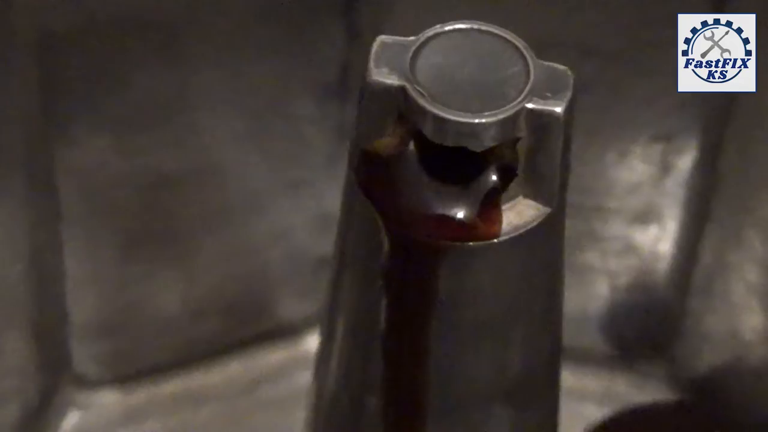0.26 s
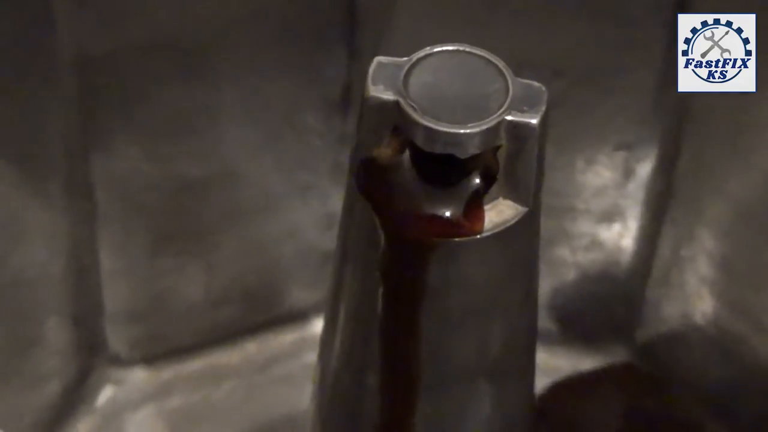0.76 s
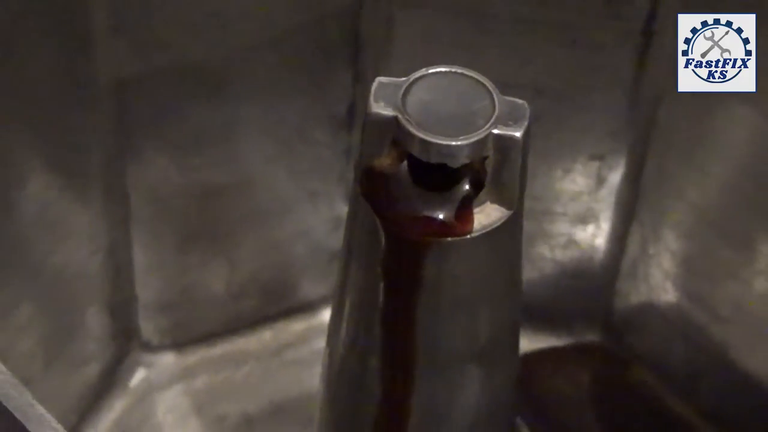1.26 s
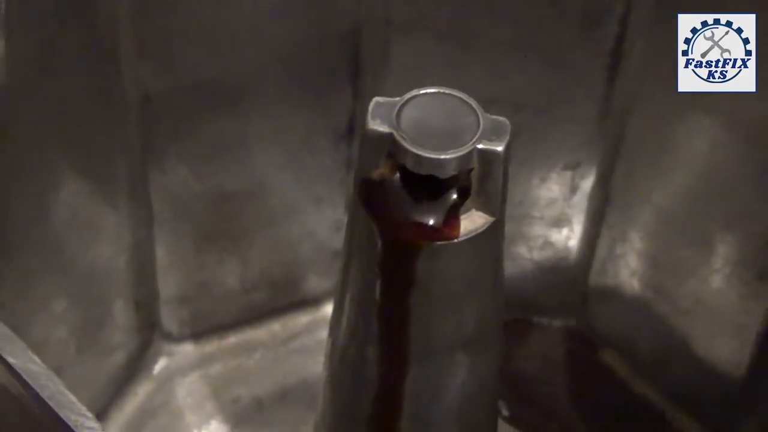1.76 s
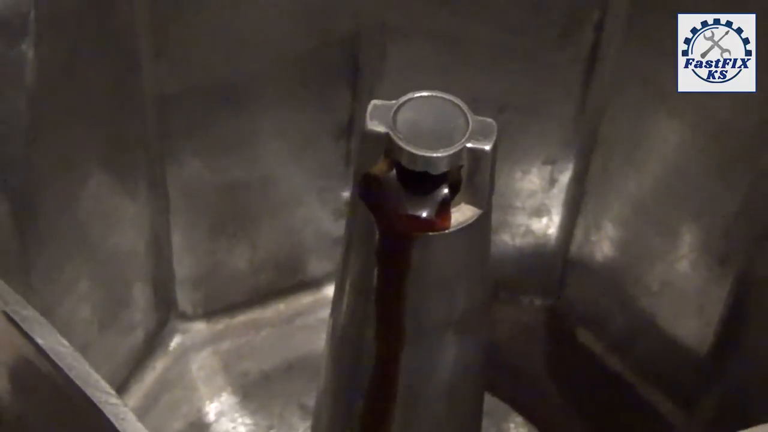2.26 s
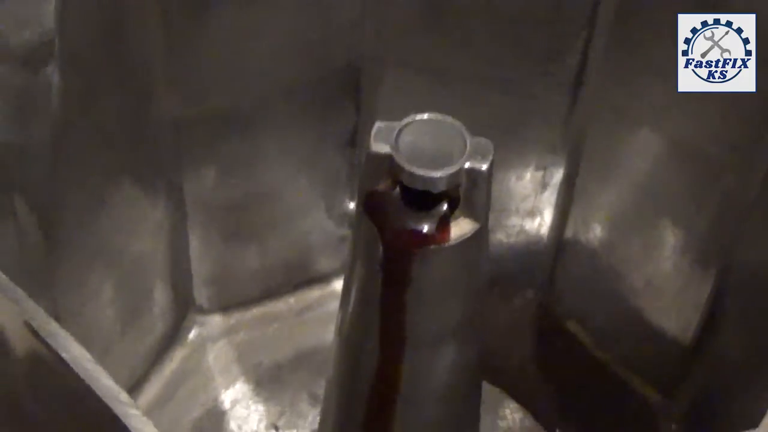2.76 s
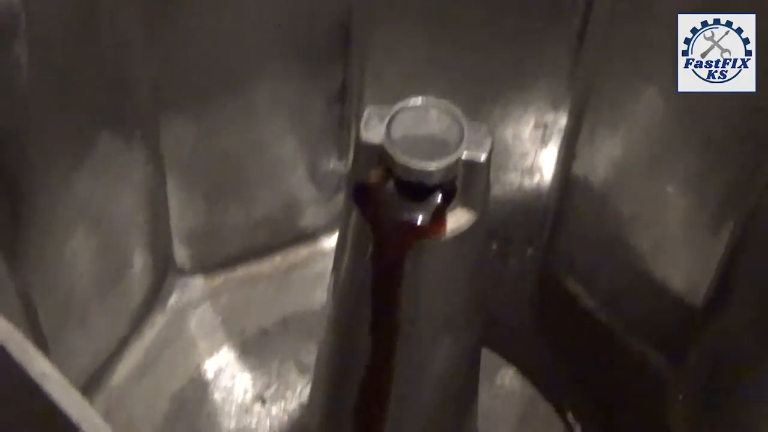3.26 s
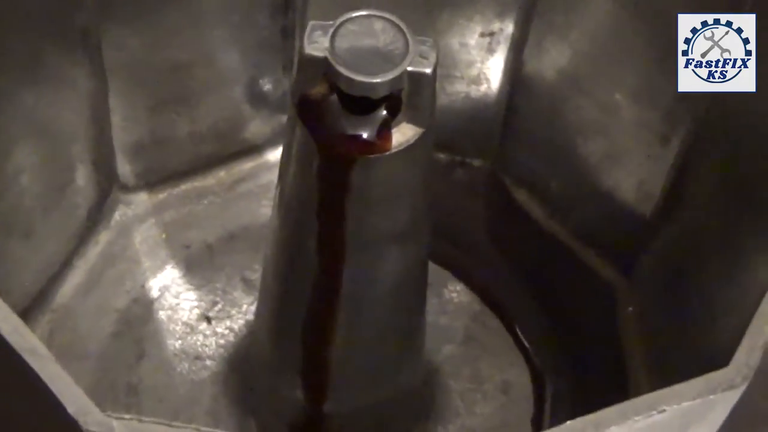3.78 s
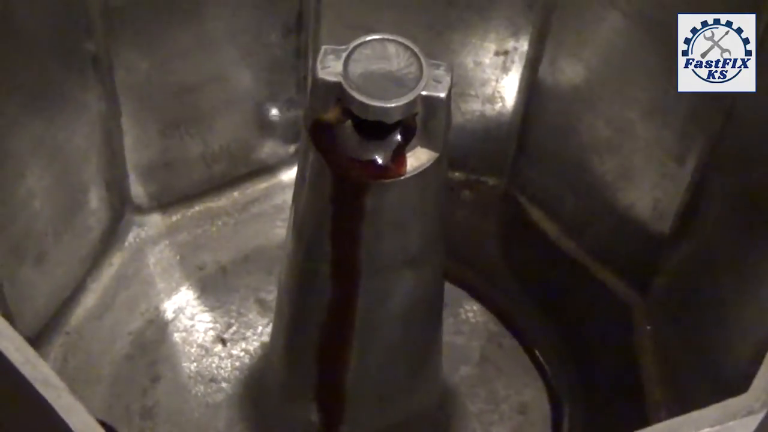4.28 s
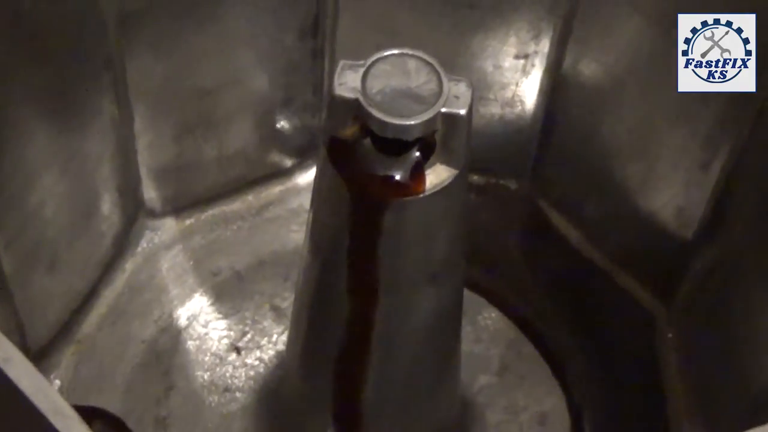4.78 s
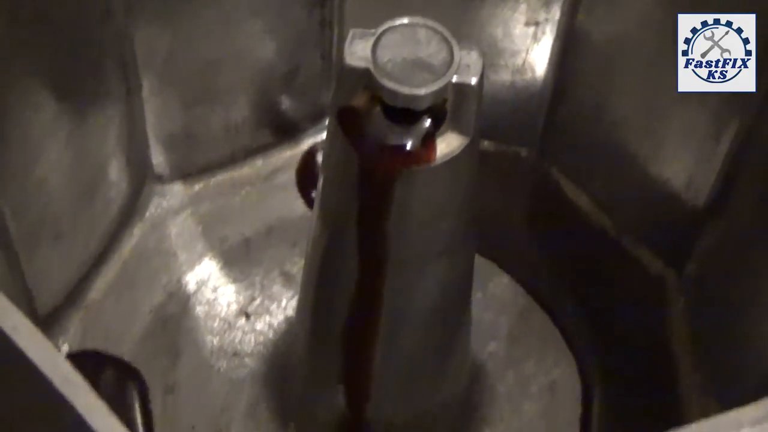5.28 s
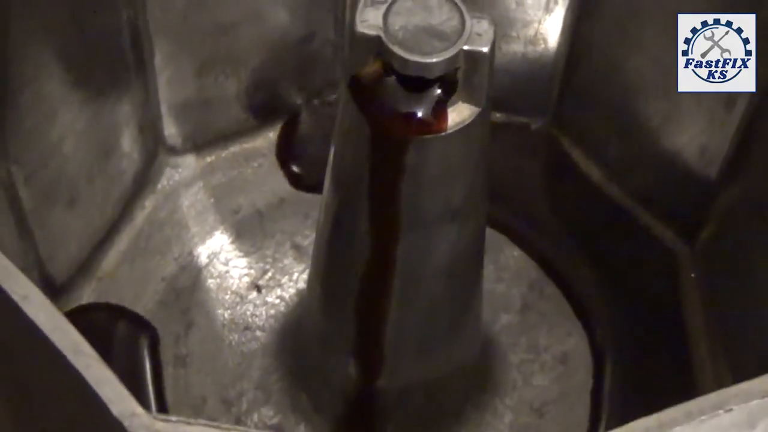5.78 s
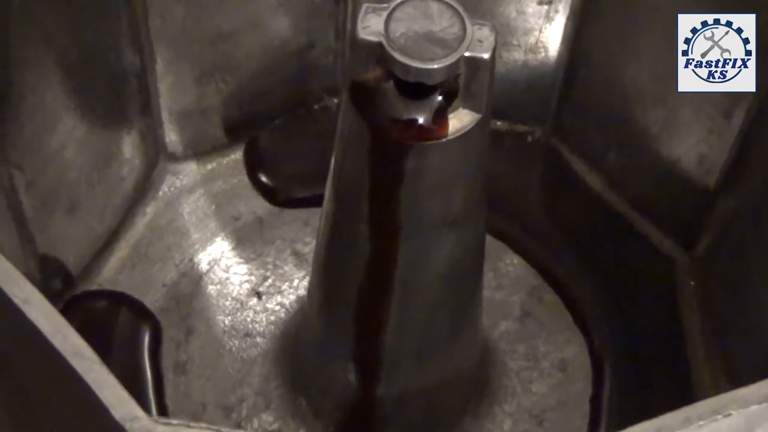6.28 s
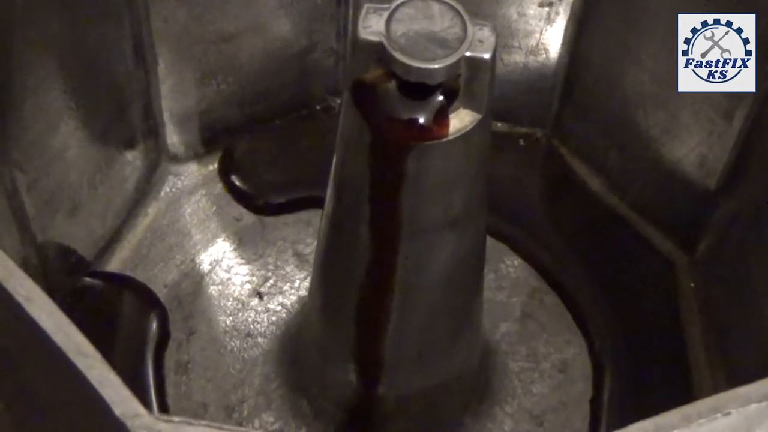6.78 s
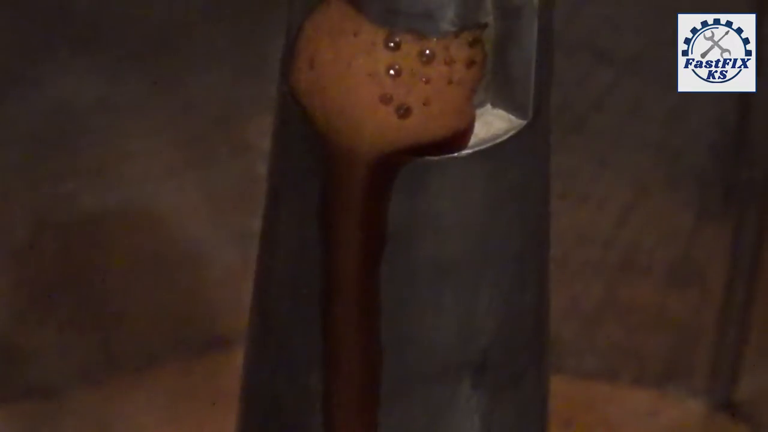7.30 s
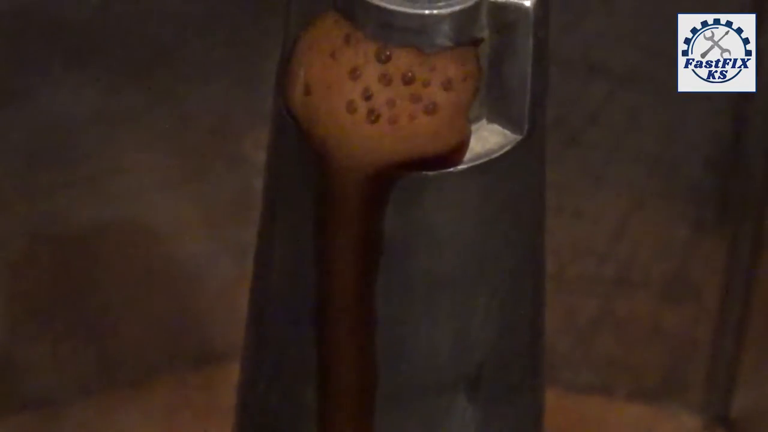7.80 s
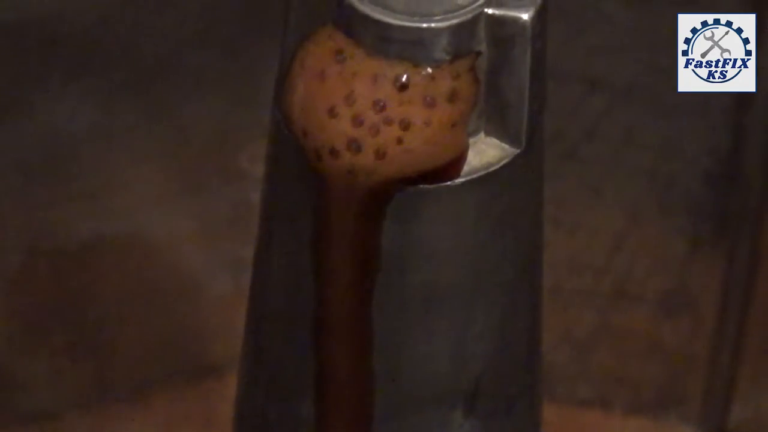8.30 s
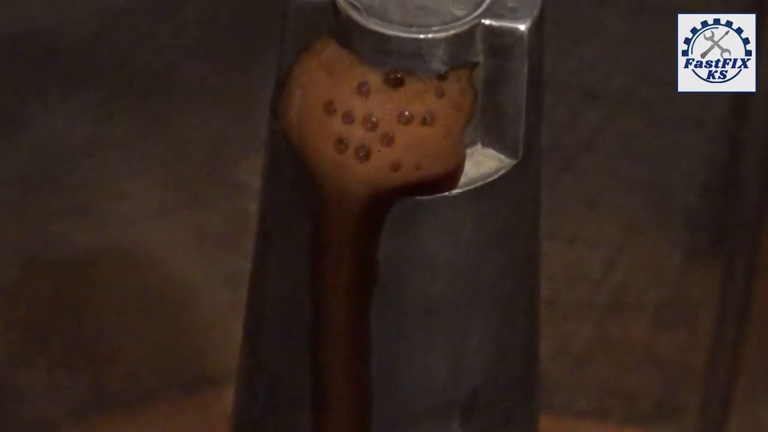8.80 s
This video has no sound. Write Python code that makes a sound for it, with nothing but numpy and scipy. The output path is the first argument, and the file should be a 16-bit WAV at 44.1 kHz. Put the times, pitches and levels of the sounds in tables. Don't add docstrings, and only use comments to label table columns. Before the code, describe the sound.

Close stereo microphone, quiet kitchen: fine, high steam hiss with a slight sputter and a weak boiling murmur beneath. Two seconds pass without pops, then hot metal snaps and knocks at irregular intervals, each with a short pot ring, the hiss dipping around them. After a cut at about seven seconds, frothy steam hisses harder, with one tick and small dull gurgles.

```python
import sys
import numpy as np
from scipy import signal
from scipy.fft import rfft, irfft, next_fast_len
from scipy.io import wavfile
from scipy.ndimage import uniform_filter1d, map_coordinates

SR = 44100
rng = np.random.default_rng(int(sys.argv[2]) if len(sys.argv) > 2 else 0)


def int16_out(signal):
    q = np.round(np.clip(np.atleast_2d(signal).T, -1, 1) * 32767)
    wavfile.write(sys.argv[1], SR, q.astype(np.int16))


def linear_from_db(decibels):
    return 10 ** (np.asarray(decibels, float) / 20)


N = 399105


def unit(x):
    return x / np.sqrt(np.mean(x ** 2) + 1e-20)


def along(points, hz):
    f, v = np.transpose(points)
    return np.interp(np.log(hz + 1), np.log(f + 1), v)


def curve(points):
    s, v = np.transpose(points)
    return np.interp(np.arange(N) / SR, s, v)


def latest(rows):
    rows = np.array(rows)
    index = np.searchsorted(rows[:, 0], np.arange(N) / SR, "right").clip(1) - 1
    return rows[index].T


def wobble(rate):
    knots = rng.standard_normal(int(N * rate / SR) + 4)
    return map_coordinates(knots, [np.arange(N) * rate / SR])


def filtered(x, response):
    m = next_fast_len(N + SR // 2)
    return irfft(rfft(x, m) * response(np.fft.rfftfreq(m, 1 / SR)), m)[..., :N]


def ping(hz, t60, t):
    return linear_from_db(-60 * t / t60) * np.sin(2 * np.pi * hz * t)


def add(track, s, sound):
    start = round(s * SR)
    track[:, start:start + sound.shape[-1]] += sound


# frequency in Hz, left-right likeness from 0 to 1.
STEREO_LIKENESS = [(60, 0.86), (150, 0.99), (380, 0.73), (950, 0.55), (2380, 0.88), (5980, 0.87),
                   (15000, 0.97)]


def rush(spectra, drive, patchy_db, ripple_db):
    z = signal.stft(rng.standard_normal((2, N)) * drive, nperseg=512)[2]
    patches = uniform_filter1d(rng.standard_normal(z.shape[1:]), 5, 0)
    patches = unit(uniform_filter1d(patches, 10, 1))
    pair = signal.istft(z * linear_from_db(patchy_db * patches), nperseg=512)[1][:, :N]
    out = []
    for spectrum in spectra:
        knots = rng.standard_normal(SR // 50)

        def mid_side_gain(hz):
            ripple = ripple_db * map_coordinates(knots, [hz / 40])
            angle = np.arccos(np.clip(along(STEREO_LIKENESS, hz), -1, 1)) / 2
            return linear_from_db(along(spectrum, hz) + ripple) * [np.cos(angle), np.sin(angle)]

        mid, side = filtered(pair, mid_side_gain)
        out.append(unit(np.array([mid + side, mid - side])))
    return out


# frequency in Hz, density in dB per Hz.
HUM_SPECTRUM = [(15, -46), (25, -18), (53, -11), (92, -17), (162, -7), (265, -5.5), (296, 0), (341, -5),
                (412, -0.5), (548, -2.5), (632, -0.5), (867, -5), (1100, -6), (1430, -28), (2420, -120)]


def kitchen_hum():
    hum, = rush([HUM_SPECTRUM], linear_from_db(0.58 * wobble(14)), patchy_db=0.7, ripple_db=0.4)
    return hum


# frequency in Hz, density in dB per Hz.
DRONE_SPECTRUM = [(220, -31), (265, -8), (297, 4), (335, 1), (400, -38)]
# time in seconds, level in dB.
DRONE_FADE = [(0, -89), (2, -88), (3.4, -82), (5, -91), (6, -94), (9.05, -107)]


def drone():
    band, = rush([DRONE_SPECTRUM], linear_from_db(1.3 * wobble(19)), patchy_db=1.5, ripple_db=5.5)
    return linear_from_db(curve(DRONE_FADE)) * band


# frequency in Hz, t60 in seconds.
ROOM_DECAY = [(300, 0.24), (1000, 0.78), (4000, 0.09), (12000, 0.15)]


def kitchen(x):
    hz, t, z = signal.stft(rng.standard_normal((2, SR // 2)), SR, nperseg=256)
    decay = linear_from_db(-60 * t / along(ROOM_DECAY, hz)[:, None])
    tail = signal.istft(z * decay, SR, nperseg=256)[1]
    tail = tail / np.linalg.norm(tail[0])
    late = np.pad(x, ((0, 0), (400, 0)))
    return signal.fftconvolve(late, tail, axes=1)[:, :N]


# start in seconds, peak level in dB, pitch in Hz, t60 in seconds.
GURGLES = [(2.613, -62, 460, .06), (2.885, -58, 420, 0.036), (3.926, -59.5, 447, 0.04),
           (5.189, -59, 492, 0.033), (6.25, -64, 500, .05), (6.255, -64, 2240, .2), (6.262, -63, 1870, .12),
           (6.28, -65, 360, 0.054), (6.3, -66, 794, .04), (6.27, -66, 1400, .04), (6.33, -63, 1100, 0.044),
           (2.093, -51, 390, 0.023), (2.23, -55, 400, .025), (2.742, -54, 380, 0.027),
           (2.012, -58, 420, .04), (2.045, -59, 446, 0.043), (6.593, -51, 480, 0.033),
           (6.594, -61, 230, 0.028), (6.5935, -48, 860, 0.015), (7.321, -53.5, 720, 0.051),
           (7.333, -57, 420, .1), (7.345, -60, 660, .08), (7.37, -60, 627, .1), (7.393, -57, 720, .05),
           (7.415, -66, 430, .1)]


def thuds():
    out, t = np.zeros((2, N + SR)), np.arange(SR // 5) / SR
    glide = t * (1 + 0.57 * t)
    swell = 1 - np.exp(-t / 0.0017)
    for s, db, hz, t60 in GURGLES:
        tone = ping(hz, t60, glide) + 0.3 * ping(3.9 * hz, t60 / 2, glide)
        add(out, s, linear_from_db(db) * swell * tone)
    return out[:, :N]


# frequency in Hz, density in dB per Hz.
SIMMER_SPECTRUM = [(410, -49), (700, -17), (871, -14.5), (941, -14), (1670, -10), (2110, -6), (3680, -8.5),
                   (4500, -0.5), (5850, -32), (9900, -120)]


def simmer(sputter):
    boil, = rush([SIMMER_SPECTRUM], linear_from_db(2.5 * sputter), patchy_db=0.9, ripple_db=1.18)
    return boil


# frequency in Hz, density in dB per Hz.
JET_COLOURS = [
    [(1760, -39), (3000, -19), (3590, -14), (3820, -14), (4410, -9), (5420, -10.5), (6700, -2), (7380, -7),
     (8010, 1), (8290, 0.5), (10300, -5.5), (10600, -8.5), (11900, -8), (14900, -16.5), (15500, -17)],
    [(1760, -37), (3000, -17.5), (3240, -14), (3490, -13.5), (4440, -8), (5310, -9), (6750, -0.5),
     (7330, -7), (7800, 1.5), (9070, -0.5), (10800, -7.5), (11700, -8), (12700, -11), (14200, -13.5),
     (15500, -19.5)],
    [(1760, -52), (3000, -22), (3260, -14), (4200, -10), (4690, -13), (5270, -10), (6260, -2), (6890, -5.5),
     (8290, 1.5), (9780, -3.5), (10400, -10), (11300, -7), (11900, -11.5), (13400, -12.5), (15500, -17.5)],
    [(1760, -42.5), (3000, -13), (3690, -13), (5130, -4), (5760, -7), (6340, -1), (7380, 0.5), (8070, -1.5),
     (8760, 0.5), (9850, -2), (10600, -2.5), (11500, -5.5), (12900, -6.5), (14000, -11.5), (15500, -11.5)],
]
# time in seconds, colour number from 0 to 3.
JET_VIEW = [(0, 0), (1.985, 0), (1.993, 1), (3.9, 1.2), (4.6, 1.9), (7.113, 2), (7.121, 3), (9.05, 3)]
# centre in Hz, width in Hz, level in dB (not
POT_WALLS = [(2680, 150, -13), (5300, 340, -5), (6250, 640, 0), (6450, 250, -1), (7400, 150, -1),
             (8850, 120, 0), (9600, 40, -2), (10500, 96, -2), (12800, 180, -6), (12400, 200, -8),
             (13300, 82, -8), (14800, 78, -12)]


def jet(sputter):
    colours = rush(JET_COLOURS, linear_from_db(sputter + 0.4 * wobble(900)), patchy_db=0.4, ripple_db=1.87)

    def wall_lift(f):
        return 1 + 0.22 * sum(1 / (1 + (2 * (f - c) / w) ** 2) for c, w, _ in POT_WALLS)

    colours[-1] = unit(filtered(colours[-1], wall_lift))
    view = curve(JET_VIEW)
    return sum(np.clip(1 - np.abs(view - k), 0, 1) * colour for k, colour in enumerate(colours))


# start in seconds, jet, simmer and hum level in dB, hum drift in dB per second.
PLACES = [
    (0, -46, -62.5, -77, 0.5),
    (1.989, -49, -64.5, -78.5, -0.38),
    (7.117, -42, -59.5, -72.5, -1.4),
]
# start in seconds, depth in dB, hold in seconds, recovery in seconds.
GAIN_DIPS = [(0, -1, 0.01, 2.4), (1.989, -1.5, .05, 1), (2.075, -4, 0.12, 0.95), (3.245, -1.5, .8, 1),
             (4.005, -3.5, 0.29, 0.62), (5.33, -2.5, 0.81, .8), (7.117, -0.5, .2, 0.47)]


def levels():
    t = np.arange(N) / SR
    start, depth_db, hold, recovery = latest(GAIN_DIPS)
    gain_db = depth_db * (1 - np.clip((t - start - hold) / recovery, 0, 1))
    start, jet_db, simmer_db, hum_db, drift = latest(PLACES)
    hum_db = hum_db + drift * (t - start) + 0.76 * gain_db
    rows = np.array([jet_db + gain_db, simmer_db + gain_db, hum_db])
    return uniform_filter1d(rows, round(0.008 * SR), axis=1)


def duck(hits):
    release = np.exp(-np.arange(SR // 10) / SR / 0.0085)
    load = signal.fftconvolve(np.mean(hits ** 2, axis=0), release / release.sum())[:N]
    return 1 / np.sqrt(1 + np.abs(load) / linear_from_db(-46.5) ** 2)


def steam():
    jet_db, simmer_db, hum_db = levels()
    sputter = 0.15 * wobble(14) + 0.23 * wobble(35) + 0.29 * wobble(300)
    hiss = linear_from_db(jet_db) * jet(sputter)
    return hiss + linear_from_db(simmer_db + 1.73) * simmer(sputter) + linear_from_db(hum_db + 1.3) * kitchen_hum()


# start in seconds, level in dB, lower and upper pitch in Hz.
BRIGHT_SNAPS = [(2.0092, -25, 2750, 7040), (2.0093, -27, 3760, 7900), (2.0924, -25.5, 4000, 5800),
                (2.188, -44, 3700, 4500), (2.2305, -40, 2700, 3970), (2.275, -44, 3800, 4500),
                (3.269, -26, 5600, 7160), (4.022, -26.5, 4130, 5900), (4.1934, -30, 3850, 5700),
                (4.2223, -29, 2590, 5800), (5.347, -26.5, 4140, 6660), (7.1470, -36, 4500, 6700)]


def snaps(out, t):
    onset = 1 - np.exp(-t / 0.00011)
    for s, db, low_hz, high_hz in BRIGHT_SNAPS:
        rattle = linear_from_db(-60 * t / 0.031) * rng.standard_normal((2, len(t)))
        crack = linear_from_db(-60 * t / 0.004) * np.diff(rng.standard_normal(len(t) + 1))
        snap = ping(low_hz, 0.0036, t) - ping(high_hz, 0.0036, t)
        snap = snap + 0.5 * ping(1.3 * high_hz, 0.0048, t) + 0.22 * crack
        snap = snap * onset
        reflected = signal.fftconvolve(rattle, snap[None, :SR // 500], axes=1)[:, :len(t)]
        add(out, s, linear_from_db(db - 2.5) * (snap + 0.048 * reflected))


# start in seconds, level in dB, pitch in Hz.
SLIPS = [(2.0110, -46, 1010), (2.0093, -49, 2900), (2.043, -52, 900), (2.0923, -29.5, 1350),
         (2.199, -50, 910), (2.2306, -33, 1070), (2.7412, -37.5, 1000), (2.892, -45, 900),
         (3.2568, -36.5, 940), (3.269, -31.5, 1640), (4.0218, -31.5, 1650), (4.1938, -34.5, 1620),
         (4.2227, -32, 1900), (5.3476, -33.5, 2000), (7.1450, -33.5, 1220)]
# delay in seconds, level in dB.
KNOCK_PATHS = [(0, -1), (.0021, -2), (.0043, -6), (.0068, -13), (.0098, -16)]
# pitch in Hz, level against the knock in dB, t60 in seconds.
POT_RING = [(660, -12.5, 0.043), (750, -7.5, 0.024), (900, -23.5, 0.1), (1082, -18.5, 0.11),
            (1240, -14, 0.062), (1400, -16, 0.034), (1950, -4, 0.019), (2680, -8, 0.023), (3690, -18, 0.03)]
# pitch scatter as a share, time scatter in seconds, level scatter in dB.
ARRIVAL_SCATTER = (.1, .0001, 2.4)


def knocks(out, t):
    pitch_scatter, time_scatter, level_scatter = ARRIVAL_SCATTER
    for s, db, hz in SLIPS:
        for delay, path_db in KNOCK_PATHS:
            a, b, c, d = rng.standard_normal(4)
            cycles = hz * (1 + pitch_scatter * d) * t
            wave = np.sin(2 * np.pi * cycles) + 0.5 * np.sin(2 * np.pi * 1.98 * cycles)
            knock = wave * 3.04 * cycles * np.exp(-1.9 * cycles)
            luck_db = level_scatter * (a + np.array([[b], [-b]]) / 4)
            add(out, s + delay + time_scatter * c, linear_from_db(db + path_db + luck_db) * knock)
        for mode_hz, mode_db, t60 in POT_RING:
            a, b, c = rng.standard_normal(3)
            ring = ping(mode_hz * (1 + pitch_scatter * c / 2), t60, t)
            luck_db = level_scatter * np.array([[a], [b]])
            add(out, s + 0.00187, linear_from_db(db + mode_db - 7 + luck_db) * ring)


# centre in Hz, width in Hz.
MODE_VALLEYS = [(530, 160), (1170, 160), (2330, 150)]
# centre in Hz, width in Hz, level in dB.
SIDE_BANDS = [(1760, 1200, -7.5), (2970, 630, -2)]


def pops():
    out, t = np.zeros((2, N + SR)), np.arange(SR // 8) / SR
    snaps(out, t)
    knocks(out, t)
    body = signal.butter(4, (590, 15000), "bandpass", fs=SR, output="sos")
    out = signal.sosfilt(body, out[:, :N])
    for hz, width in MODE_VALLEYS:
        notched = signal.lfilter(*signal.iirnotch(hz, hz / width, SR), out)
        out = out + 0.8 * (notched - out)

    def apart(f):
        bands = sum(linear_from_db(db) * 1j * f * w / (c * c - f * f + 1j * f * w) for c, w, db in SIDE_BANDS)
        return np.exp(2j * np.pi * f * 0.00013) * bands

    return out + filtered(out.mean(0), apart) * [[1], [-1]]


def scene():
    hits = pops() + thuds()
    return hits + linear_from_db(-22) * kitchen(hits) + duck(hits) * steam() + drone()


def low_pass(x):
    return signal.sosfilt(signal.butter(12, 16470, fs=SR, output="sos"), x)


# frequency in Hz, left minus right in dB.
PORT_TILT = [(60, 0.5), (150, 0.5), (380, 0.5), (950, 0), (2380, 2), (5980, 2.0), (15000, 0.5)]


def record(dry):
    def ports(hz):
        tilt_db = along(PORT_TILT, hz) / 2 * np.array([[1], [-1]])
        return linear_from_db(tilt_db) * (hz < 15790)

    return low_pass(filtered(dry, ports))


dry = scene()
out = record(dry)
int16_out(out)
```